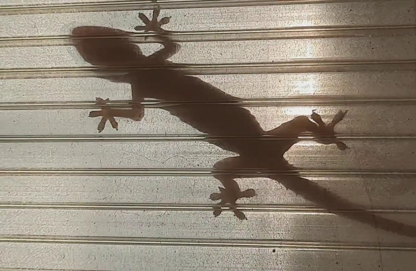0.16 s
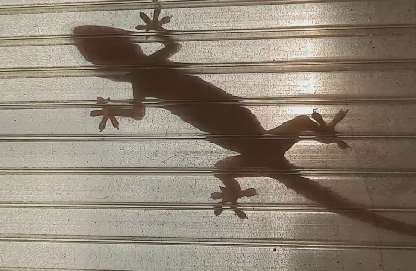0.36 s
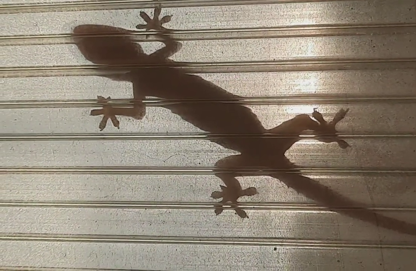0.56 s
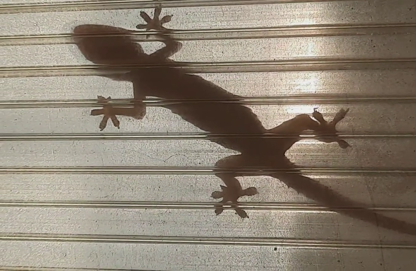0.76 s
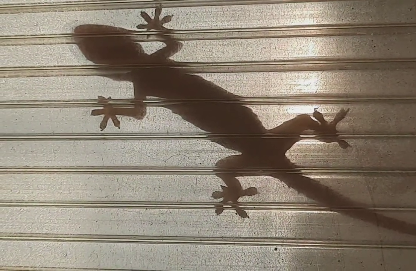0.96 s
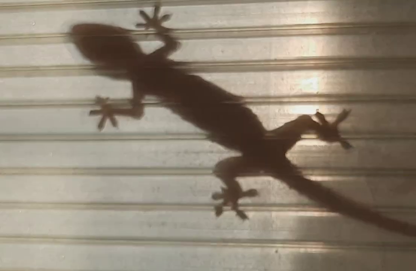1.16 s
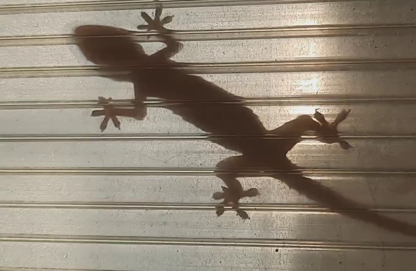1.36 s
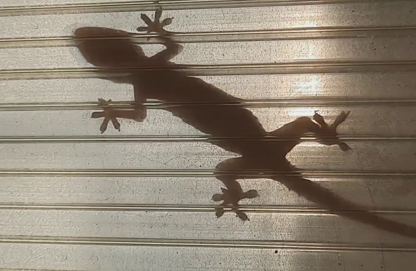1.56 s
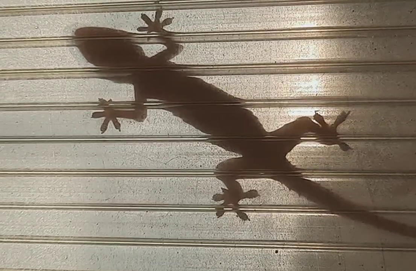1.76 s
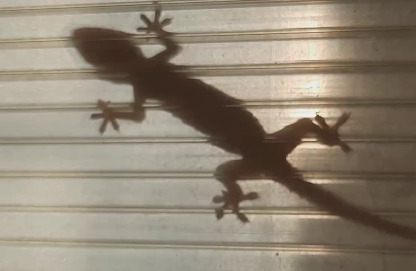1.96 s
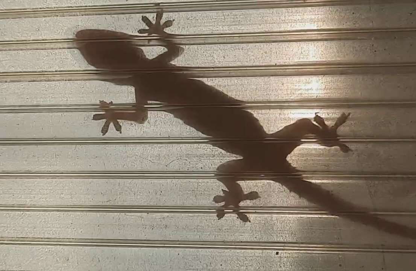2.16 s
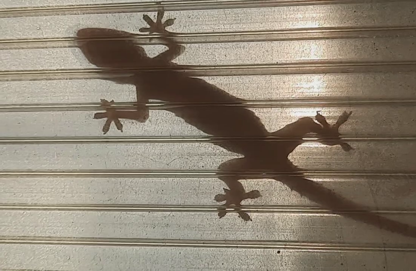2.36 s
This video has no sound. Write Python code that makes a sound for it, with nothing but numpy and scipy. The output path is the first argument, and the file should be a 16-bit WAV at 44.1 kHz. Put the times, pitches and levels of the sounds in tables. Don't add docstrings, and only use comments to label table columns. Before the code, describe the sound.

A gecko's double chirp, close in a quiet room. At about 0.23 s a very short squeak arches from 1.5 to 2.5 kHz and crumbles into a slowing creak until 0.29 s. At 0.40 s a louder, brighter squeak climbs to 2.7 kHz, ending in a tiny creak by 0.47 s. Steady 50 Hz hum, faint rumble and hiss continue throughout; a barely audible high tick comes near 2.03 s.

```python
import sys
import numpy as np
from scipy import signal
from scipy.fft import rfft, irfft
from scipy.io import wavfile
from scipy.ndimage import uniform_filter1d

SR = 44100
rng = np.random.default_rng(int(sys.argv[2]) if len(sys.argv) > 2 else 0)


def unload_wav(signal):
    wavfile.write(
        sys.argv[1],
        SR,
        np.round(np.clip(np.atleast_2d(signal).T, -1, 1) * 32767).astype(np.int16),
    )


def volts_from_decibels(level):
    exponent = np.asarray(level, float) / 20
    return 10 ** exponent


N = 110250

# frequency_hz [Hz], gain_db [dB]
MOUTH_GAIN = [(1600, -26), (3000, -14), (4500, 0), (5290, 0), (5520, -8), (6200, -9), (7300, -31),
              (11000, -48)]
ATTACK_DB_PER_S, RELEASE_DB_PER_S = 30000, 18000
PITCH_JITTER, SHIMMER_DB = 0.002, 0.5
RASP_DB, SLACK_RASP_DB_PER_HZ, UPPER_RASP = -33, 0.022, 0.5
TOP_HZ, TOP_DB_PER_HZ = 11300, 0.012


def squeak(shape, effort, overtones=5):
    t = np.arange(N) / SR
    pitch_hz, low_boost_db, high_boost_db, _ = controls(shape)
    effort_db = controls(effort)[0]
    start_s, end_s = effort[0][0], effort[-1][0]
    effort_db = effort_db - ATTACK_DB_PER_S * np.maximum(start_s - t, 0)
    effort_db = effort_db - RELEASE_DB_PER_S * np.maximum(t - end_s, 0)
    effort_db = uniform_filter1d(effort_db, size=20)
    pitch_hz = uniform_filter1d(pitch_hz, size=100) * (1 + PITCH_JITTER * drift(380))
    phase = 2 * np.pi * np.cumsum(pitch_hz) / SR
    slack_rasp_db = RASP_DB + SLACK_RASP_DB_PER_HZ * np.maximum(2500 - pitch_hz, 0)
    voice = 0
    for k in range(1, overtones + 1):
        overtone_hz = k * pitch_hz
        boost_db = low_boost_db if k == 1 else high_boost_db * (k > 2)
        top_loss_db = TOP_DB_PER_HZ * np.maximum(overtone_hz - TOP_HZ, 0)
        level_db = effort_db + boost_db + at_hz(MOUTH_GAIN, overtone_hz) - top_loss_db
        gain = volts_from_decibels(level_db + SHIMMER_DB * drift(200))
        rasp = volts_from_decibels(slack_rasp_db) * drift(450) + UPPER_RASP * (k > 2) * drift(245)
        voice = voice + gain * (1 + rasp) * np.sin(k * phase)
    return np.sqrt(2) * voice


SLIP_SCATTER_TURNS, SLIP_SPREAD_DB = 0.1, 1.3
SLACK_TONE_LOW_HZ = 1300


def creak(rows, throat, tone_db=-99):
    slips_per_s, level_db, gate = controls(rows)
    turns = np.cumsum(slips_per_s * gate) / SR + SLIP_SCATTER_TURNS * drift(400)
    slips = np.diff(np.maximum.accumulate(np.floor(turns)), prepend=0) > 0
    slips = slips * gate * volts_from_decibels(level_db + SLIP_SPREAD_DB * rng.standard_normal(N)) + 1e-18
    rings = 0
    for k, (hz, width_hz, ring_db) in enumerate(throat):
        stage_hz = 1.43 * width_hz
        ring = resonance(resonance(slips, hz, stage_hz), hz, stage_hz)
        rings = rings + (-1) ** k * volts_from_decibels(ring_db) * ring
    fade = np.clip(slips_per_s / SLACK_TONE_LOW_HZ - 0.7, 0, 0.4) / 0.36
    tone = np.sin(2 * np.pi * np.cumsum(slips_per_s) / SR)
    return 30 * rings + gate * fade * volts_from_decibels(level_db + tone_db) * tone


# frequency_hz [Hz], width_hz [Hz], level_db [dB]
THROAT_RINGS = [(1500, 1600, -27), (2300, 560, -12), (3560, 580, -12), (4650, 430, 3), (5200, 470, -10),
                (6200, 330, -17.5), (7900, 1200, -34.5)]
# start_s [s], slip_rate [slips/s], level_db [dB]
FIRST_CATCH_SLIPS = [
    (.2272, 950, -56),
    (.2288, 1100, -30),
    (.2296, 1600, -35),
    (.2325, 1300, -60),
]
# start_s [s], pitch_hz [Hz], fundamental_boost_db [dB], upper_boost_db [dB]
FIRST_ARCH = [
    (.2283, 1500, 0, 4),
    (.2298, 1570, 7, -2),
    (.2318, 2070, 15, 5),
    (.2346, 2300, 8, -19.5),
    (.2385, 2530, 12.5, 8),
    (.2430, 2533, 9.5, 0),
    (.2495, 2251, 8, -18),
    (.2540, 1960, 14, 2),
]
# start_s [s], effort_db [dB]
FIRST_BREATH = [
    (.2300, -33),
    (.2313, -41),
    (.2346, -21),
    (.2373, -31),
    (.2393, -26),
    (.2452, -29),
    (.2487, -21),
    (.2515, -38),
    (.2535, -35),
]
# start_s [s], slip_rate [slips/s], level_db [dB]
FIRST_CREAK_SLIPS = [
    (.2535, 1700, -40.5),
    (.2555, 1260, -32),
    (.2600, 960, -34),
    (.2660, 820, -35.5),
    (.2720, 890, -44),
    (.2785, 520, -38),
    (.2805, 600, -51),
    (.2825, 600, -43.5),
    (.2930, 510, -70),
]


def first_call():
    catch = creak(FIRST_CATCH_SLIPS, THROAT_RINGS)
    arch = squeak(FIRST_ARCH, FIRST_BREATH)
    return catch + arch + creak(FIRST_CREAK_SLIPS, THROAT_RINGS, tone_db=-17.5)


# start_s [s], slip_rate [slips/s], level_db [dB]
SECOND_CATCH_SLIPS = [
    (.3985, 900, -59),
    (.4006, 991, -45),
    (.4016, 1300, -32.5),
    (.4055, 1600, -40),
]
# start_s [s], pitch_hz [Hz], fundamental_boost_db [dB], upper_boost_db [dB]
SECOND_ARCH = [
    (.3995, 1420, 2, 0),
    (.4035, 1797, 0.5, -1),
    (.4085, 2067, -4, 1),
    (.4160, 2040, 7.5, 2),
    (.4200, 2316, -4.5, -7),
    (.4330, 2629, -0.5, 4),
    (.4435, 2748, -0.5, 1.5),
    (.4510, 2520, 0, -6.5),
    (.4615, 2376, -11.5, -3),
]
# start_s [s], effort_db [dB]
SECOND_BREATH = [
    (.4022, -30),
    (.4100, -24),
    (.4168, -29),
    (.4198, -17),
    (.4243, -17),
    (.4259, -25),
    (.4300, -17),
    (.4490, -14),
    (.4604, -21),
]
# start_s [s], slip_rate [slips/s], level_db [dB]
LAST_CREAK_SLIPS = [
    (.4605, 1200, -30.5),
    (.4632, 800, -34.5),
    (.4662, 600, -41),
    (.4700, 320, -57),
]
# frequency_hz [Hz], width_hz [Hz], level_db [dB]
WIDE_THROAT_RINGS = [(2640, 180.3, 2), (4750, 372, -3.5), (5350, 349, -0.5), (7200, 303, -13)]


def second_call():
    catch = creak(SECOND_CATCH_SLIPS, THROAT_RINGS)
    arch = squeak(SECOND_ARCH, SECOND_BREATH)
    return catch + arch + creak(LAST_CREAK_SLIPS, WIDE_THROAT_RINGS)


NEAR_DB, NEAR_T60_S, ROOM_DB, ROOM_T60_S = -29, 0.03, -42, 0.18


def room(x):
    t = np.arange(SR // 2) / SR
    near, far = rng.standard_normal((2, len(t)))
    near = volts_from_decibels(NEAR_DB) * rms_one(near * volts_from_decibels(-60 * t / NEAR_T60_S))
    far = volts_from_decibels(ROOM_DB) * rms_one(far * volts_from_decibels(-60 * t / ROOM_T60_S))
    echo = (near + far) / np.sqrt(len(t))
    return x + signal.fftconvolve(x, echo)[:N]


# multiple [of the mains frequency], level_db [dB rms]
MAINS_OVERTONES = [(1, -34), (3, -75.5), (5, -69), (9, -71), (11, -78.5)]
MAINS_HZ, MAINS_START_RAD = 49.972, 2.33


def hum():
    phase = 2 * np.pi * MAINS_HZ * np.arange(N) / SR + MAINS_START_RAD
    return sum(np.sqrt(2) * volts_from_decibels(db) * np.sin(round(k) * phase) for k, db in MAINS_OVERTONES)


# frequency_hz [Hz], density_db [dB per Hz]
AIR_SPECTRUM = [(30, 0.5), (110, 0.5), (220, -7.5), (350, -16), (700, -16), (900, -20.5), (3000, -27.5),
                (15000, -31)]
# frequency_hz [Hz], width_hz [Hz], level_db [dB rms]
MACHINE_DRONES = [(35.92, 7.77, -60), (255.9, 46, -66.5), (472.5, 14, -75.5), (655.6, 60, -76.5),
                  (6830, 306, -83)]
AIR_DB = -57
TICK_S, TICK_HZ, TICK_DB, TICK_LENGTH_S = 2.027, 12300, -71, 0.0049


def background():
    hz = np.maximum(np.fft.rfftfreq(N, 1 / SR), 1)
    hiss = irfft(rfft(rng.standard_normal(N)) * volts_from_decibels(at_hz(AIR_SPECTRUM, hz)), N)
    out = volts_from_decibels(AIR_DB) * rms_one(hiss)
    for drone_hz, width_hz, db in MACHINE_DRONES:
        drone = resonance(rng.standard_normal(N), drone_hz, width_hz)
        out += volts_from_decibels(db) * rms_one(resonance(drone, drone_hz, width_hz))
    burst = np.exp(-0.5 * ((np.arange(N) / SR - TICK_S) / TICK_LENGTH_S) ** 2)
    tick = burst * rms_one(resonance(rng.standard_normal(N), TICK_HZ, 2500))
    return out + volts_from_decibels(TICK_DB) * tick


def rms_one(x):
    return x / np.sqrt(np.mean(x ** 2) + 1e-20)


def at_hz(points, hz):
    p = np.array(points)
    return np.interp(np.log(hz), np.log(p[:, 0]), p[:, 1])


def drift(rate_hz):
    r = np.exp(-2 * np.pi * rate_hz / SR)
    noise = rng.standard_normal(N + SR)
    return rms_one(signal.lfilter([1], [1, -2 * r, r * r], noise)[SR:])


def resonance(x, hz, width_hz):
    r = np.exp(-np.pi * width_hz / SR)
    zeros = np.array([1, 0, -1]) * (1 - r * r) / 2
    poles = [1, -2 * r * np.cos(2 * np.pi * hz / SR), r * r]
    return signal.lfilter(zeros, poles, x)


def controls(rows):
    s, *columns = np.transpose(rows)
    t = np.arange(N) / SR
    gate = (t > s[0]) & (t < s[-1])
    return [np.interp(t, s, c) for c in columns] + [gate]


SIDE_DB, SIDE_GRAIN_HZ = -36.5, 500


def scene():
    call = first_call() + second_call()
    mono = room(call) + hum() + background()
    side = volts_from_decibels(SIDE_DB) * call * drift(SIDE_GRAIN_HZ)
    return np.array([mono + side, mono - side])


def low_pass(x):
    return signal.sosfilt(signal.butter(12, 15980, fs=SR, output="sos"), x)


OFFSET, OFFSET_WANDER = -0.003, 0.0009
CUTOFF_HZ = 15800


def record(dry):
    top_cut = signal.cheby2(12, 60, CUTOFF_HZ + 400, fs=SR, output="sos")
    mix = signal.sosfilt(top_cut, dry) + OFFSET + OFFSET_WANDER * drift(1.8)
    return low_pass(mix)


dry = scene()
out = record(dry)
unload_wav(out)
```